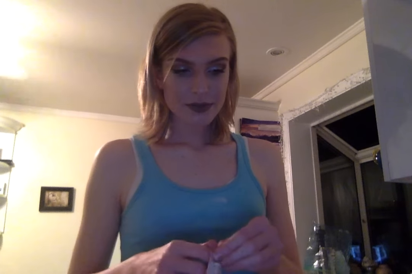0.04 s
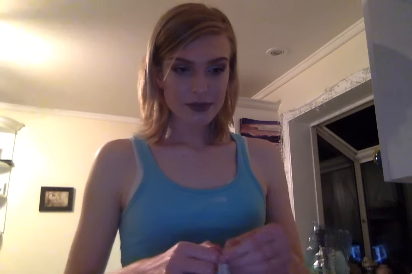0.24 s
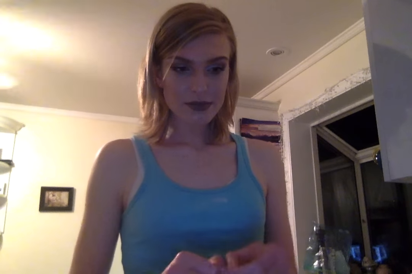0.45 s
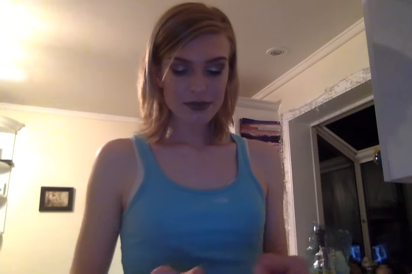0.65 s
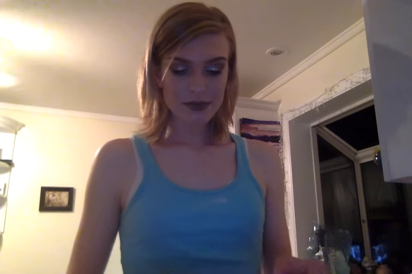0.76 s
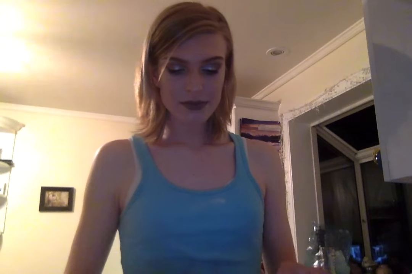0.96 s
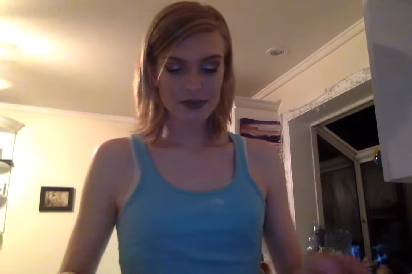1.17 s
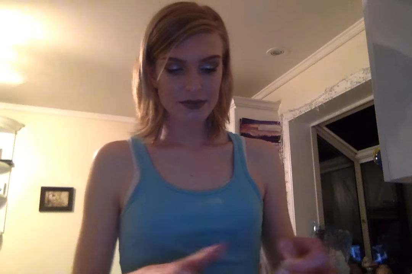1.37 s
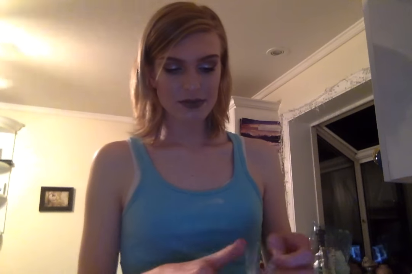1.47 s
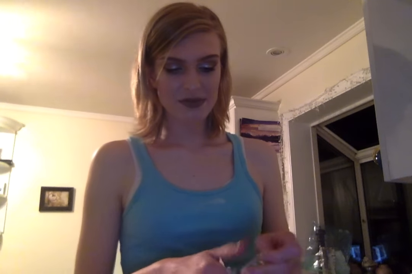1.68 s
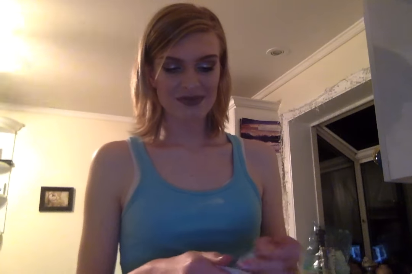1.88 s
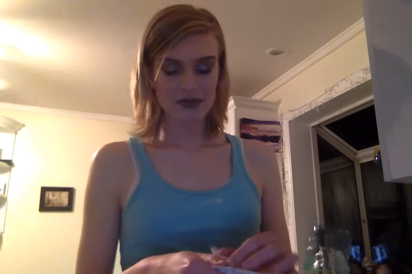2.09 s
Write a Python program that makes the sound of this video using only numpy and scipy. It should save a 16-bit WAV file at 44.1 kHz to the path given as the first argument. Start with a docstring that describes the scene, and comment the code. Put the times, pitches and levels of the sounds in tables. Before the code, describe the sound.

A small wrapper of paper and plastic film is peeled open by hand, close to the microphone. In the first half second the film gives a few light, crisp snaps. At about 0.6 seconds the seal tears in one pull lasting until about 0.9 seconds. This is the loudest part, with a crackly rip, a slight drumming of taut paper, sharp snaps and soft bumps of the fingers against the packet. After a brief lull, a very short rip comes at 1.1 seconds, followed by uneven crinkling and clicking as the film bends. A second, weaker rip comes at 1.7 seconds, and lighter crinkles and snaps continue to the end, just after 2 seconds. The kitchen adds a slight, short reverberation, and a faint, steady fan noise with electrical hum lies underneath throughout.

```python
"""A paper-and-film syringe wrapper is peeled open by hand, close by, over a faint fan and mains hum.
First the film buckles in a few light snaps, each reflected by the kitchen counter and walls.
At 0.6 s the seal tears in one long pull: fibres break, the paper drums, the snaps grow loud
and the fingers bump the packet. Then the bent film crinkles and snaps on to the end,
while the seal gives in two short rips, at 1.1 s and 1.7 s."""
import sys
import numpy as np
from scipy import signal
from scipy.fft import rfft, irfft
from scipy.io import wavfile
from scipy.ndimage import uniform_filter1d

SR = 44100
rng = np.random.default_rng(int(sys.argv[2]) if len(sys.argv) > 2 else 0)


def persist_wave(psi):
    """Save psi, clipped to +-1, as 16-bit WAV."""
    counts = np.round(np.clip(psi, -1, 1) * 32767).astype(np.int16)
    wavfile.write(sys.argv[1], SR, np.atleast_2d(counts).T)


N = 94550
TIME = np.arange(N) / SR

# spectrum of the fan's air noise: (frequency [Hz], relative level [dB])
FAN_SPECTRUM = [(30, -35), (85, -10), (170, -4), (240, 1), (400, -4), (680, -11.5), (870, 1), (1300, -8.5),
                (1800, -20), (3200, -24), (5500, -22), (9000, -31), (12000, -42), (15000, -73.5)]
# mains hum and fan tones: (frequency [Hz], rms level [dB])
HUM_TONES = [(60, -95.5), (99, -111), (120, -89.5), (167, -83), (590, -90.5), (1170, -74)]
# reflections from the counter, hands and body: (delay [s], gain [ratio])
EARLY_ECHOES = [(.0011, 0.17), (.0029, 0.2), (.0042, 0.12), (.0074, 0.067)]
# reverberation of the kitchen: (frequency [Hz], time to fall 60 dB [s])
REVERB_TIMES = [(200, 0.18), (1000, 0.28), (2500, 0.21), (5000, 0.17), (8000, 0.17), (15000, 0.15)]
# fingers bumping the packet: (time [s], energy [dB], centre frequency [Hz])
FINGER_BUMPS = [(.645, -26, 497), (0.674, -44, 308), (0.73, -30, 297), (0.75, -36, 304),
                (0.839, -38.5, 380), (0.86, -45, 387), (1.115, -40, 273)]
# fingers bending the wrapper: (start [s], rise [s], hold [s], relative level [dB])
FILM_BENDS = [(0, 0.001, 0.023, -49.5), (0.877, 0.019, 0.012, -48.5), (1.002, .004, 0.0031, -53.5),
              (1.126, 0.011, 0.16, -48), (1.243, 0.0076, 0.014, -42), (1.371, 0.0054, 0.0025, -44.5),
              (1.413, 0.0052, 0.0022, -56.5), (1.575, 0.019, .17, -48), (1.594, 0.0093, 0.014, -38.5),
              (1.908, 0.04, .018, -48), (1.969, 0.02, 0.027, -42.5), (2.048, 0.017, 0.0034, -45.5),
              (2.115, 0.023, .01, -41)]
# spectrum of the creasing film: (frequency [Hz], relative level [dB])
FILM_SPECTRUM = [(200, -16), (700, -20), (1300, -8.5), (1900, -9.5), (2600, 4), (3200, -4), (4700, 3),
                 (7000, 0.5), (10000, -6), (15000, -8)]
# spectrum of the breaking seal: (frequency [Hz], relative level [dB])
SEAL_SPECTRUM = [(50, -51), (200, -34), (600, -47), (900, -21.5), (1500, -4.5), (2000, -10.5), (2550, 2),
                 (3200, -4.5), (4700, 0), (7000, -3.5), (10000, -9), (15000, -14)]
# spectrum of the taut paper: (frequency [Hz], relative level [dB])
SHEET_SPECTRUM = [(40, -58.5), (120, -35.5), (260, -29), (400, -15.5), (560, -12.5), (780, -5.5),
                  (1050, -2.5), (1400, 0), (2000, -6), (4000, -8), (15000, -18.5)]
# tugs on the paper within the long pull: (time [s], level [dB])
SHEET_TUGS = [(0.625, -32.5), (0.66, -38), (0.719, -40.5), (0.788, -46.5)]
# short rips: (start [s], rise and hold [s], decay constant [s], seal level [dB], knock level [dB],
# knock's low edge [Hz], knock's high edge [Hz])
SHORT_RIPS = [(1.1118, 0.0079, 0.0027, -24, -40.5, 790, 1170),
              (1.7104, 0.0038, 0.0031, -34.5, -39.5, 580, 1380)]
# buckles of the film: (time [s], energy before bass loss [dB], centre frequency [Hz],
# bandwidth [octaves], flutter decay constant [s])
FILM_BUCKLES = [(0.005, -18.5, 4630, 0.86, 0.0031), (0.0257, -22.5, 4380, 0.39, 0.0083),
                (0.099, -35.5, 3800, 1.27, 0.0053), (0.2042, -13.5, 9540, 0.45, 0.00029),
                (0.2039, -31, 1870, 0.52, 0.0011), (0.204, -22.5, 5060, 0.83, 0.003),
                (0.2708, -24.5, 6780, 0.86, 0.0002), (0.2724, -14, 4520, 0.52, 0.00058),
                (0.5058, -37.5, 3790, 0.4, 0.00057), (0.5545, -28.5, 5800, 0.23, 0.0014),
                (0.569, -18.5, 5640, 1.46, 0.0018), (0.5866, -16.5, 6000, 2, 0.0006),
                (0.6041, -11, 6540, 1.4, 0.00093), (0.629, -2.5, 5150, 1.14, 0.00019),
                (0.6739, -2, 7300, 2.4, 0.00022), (0.6853, -7.5, 7600, 1.6, 0.00019),
                (0.6883, -3, 3660, 1.64, 0.001), (0.707, -13, 5900, 1.9, 0.00045),
                (0.7412, 1, 5100, 1.43, 0.00055), (0.7657, -8, 5100, 1.7, 0.00021),
                (0.781, -9, 5940, 1.5, 0.0025), (0.7975, -3.5, 3550, 1.7, 0.001),
                (0.8107, -14, 5530, 2.7, 0.0004), (0.8382, -7.5, 4400, 1.87, 0.0051),
                (0.8464, -9.5, 4940, 0.18, 0.0018), (0.9405, -27.5, 2980, 0.76, 0.00043),
                (1.0123, -25.5, 7400, 1.8, 0.000746), (1.0989, -17.5, 5500, 0.76, 0.00024),
                (1.15, -14, 8300, 1.3, 0.00019), (1.1819, -11.5, 4740, 2.04, 0.00026),
                (1.186, -7, 3860, 1, 0.00039), (1.2043, -21, 5240, 2.2, 0.00041),
                (1.23, -18, 4140, 2.6, 0.00028), (1.244, -7, 4870, 1.27, 0.00014),
                (1.2482, -10.5, 5960, 5, 0.00023), (1.274, -17.5, 4370, 2.7, 0.00026),
                (1.3285, -27, 3800, 0.63, 0.003), (1.3525, -17.5, 5650, 1.5, 0.0021),
                (1.3774, -18, 4820, 1.9, 0.0015), (1.3842, -15, 7220, 0.23, 0.00023),
                (1.422, -29, 5600, 0.94, 0.002), (1.5445, -10.5, 3430, 1.98, 0.0017),
                (1.5486, -13, 4000, 1.96, 0.00059), (1.5559, -18.5, 5640, 1.2, 0.0004),
                (1.5842, -13.5, 4200, 2, 0.002), (1.633, -13.5, 3330, 1.65, 0.0032),
                (1.6999, -12, 8800, 1.7, 0.00024), (1.705, -12.5, 3350, 2.3, 0.00013),
                (1.724, -30, 5140, 0.43, 0.001), (1.8399, -28.5, 4000, 1.13, 0.002),
                (1.8574, -28.5, 2760, 1.35, 0.001), (1.887, -32.5, 2790, 0.25, 0.001),
                (1.9349, -26, 6480, 1.1, 0.0015), (2.0124, -16.5, 5180, 2.5, 0.0047),
                (2.0675, -19.5, 3960, 1.35, 0.0023), (2.117, -13.5, 6300, 1.24, 0.00068)]


def from_db(db):
    """Amplitude ratio: tenfold for every 20 dB."""
    return 10 ** (np.asarray(db) / 20)


def rms_one(x):
    """Normalisation to unit mean power."""
    return x / np.sqrt(np.mean(x ** 2) + 1e-20)


def energy_one(x):
    """Normalisation to unit total energy."""
    return x / np.sqrt(np.sum(x ** 2) + 1e-20)


def at_hz(points, hz):
    """Interpolation of a table on a logarithmic frequency axis."""
    frequencies, values = np.transpose(points)
    return np.interp(np.log(np.maximum(hz, 1)), np.log(frequencies), values)


def band(x, low_hz, high_hz, order=2):
    """Causal band-pass filtering, with edges held below half the sample rate."""
    top_hz = min(high_hz, .47 * SR)
    edges = [min(low_hz, top_hz - 100), top_hz]
    return signal.sosfilt(signal.butter(order, edges, "band", fs=SR, output="sos"), x)


def resonance(force, hz, octaves):
    """Resonance: a body responds in a band around its natural frequency. Unit energy."""
    half_width = 2 ** (octaves / 2)
    return energy_one(band(force, hz / half_width, hz * half_width))


def colour(x, spectrum, size=2048):
    """Minimum-phase filtering to a given spectrum: nothing sounds before its cause."""
    gains = from_db(at_hz(spectrum, np.fft.rfftfreq(size, 1 / SR)))
    cepstrum = irfft(np.log(gains))
    cepstrum[1:size // 2] *= 2
    cepstrum[size // 2 + 1:] = 0
    response = irfft(np.exp(rfft(cepstrum)))
    return signal.fftconvolve(x, response)[:len(x)]


def gesture(start_s, attack_s, hold_s, release_db_per_s, sag_db_per_s=0):
    """Envelope of one hand movement: linear rise, a hold that may sag, exponential relaxation."""
    age = TIME - start_s
    held = np.maximum(age - attack_s, 0)
    fall_db = sag_db_per_s * np.minimum(held, hold_s) + release_db_per_s * np.maximum(held - hold_s, 0)
    return np.clip(age / attack_s, 0, 1) * from_db(-fall_db)


def stick_slip(depth_db, rate_hz):
    """Stick-slip friction: random catching and slipping modulates the amplitude. Unit rms."""
    steps = np.clip(rng.standard_normal(N), -1.7, 1.7)
    grip = uniform_filter1d(steps[(TIME * rate_hz).astype(int)], size=40)
    return rms_one(from_db(depth_db * grip))


def grains(per_s, spread_db, even_s=0.0062):
    """Shot noise: tiny fractures of uneven size, fed steady power by a steady hand. Unit rms."""
    sizes = from_db(spread_db * np.minimum(rng.exponential(1, N), 4)) * rng.choice([-1, 1], N)
    clicks = sizes * (rng.random(N) < per_s / SR)
    power = uniform_filter1d(clicks ** 2, int(even_s * SR))
    return rms_one(clicks / np.sqrt(np.abs(power) + 0.11 * power.mean()))


def pitched_grains(per_s, spread_db, count=7):
    """Local resonance: each fracture rings its own patch of film, in a band about an octave wide."""
    edges_hz = np.geomspace(500, 19000, count + 1)
    patches = [band(grains(per_s / count, spread_db), low / 1.15, high * 1.15)
               for low, high in zip(edges_hz, edges_hz[1:])]
    return rms_one(sum(patches))


def fan(air_db=-70.5, whirr_db=-70):
    """Flow noise of a small fan, with a duct resonance and steady fan and mains tones."""
    air = from_db(air_db) * rms_one(colour(rng.standard_normal(N), FAN_SPECTRUM))
    whirr = from_db(whirr_db) * rms_one(band(rng.standard_normal(N), low_hz=1080, high_hz=1280))
    hum = sum(np.sqrt(2) * from_db(db) * np.sin(2 * np.pi * (hz * TIME + rng.random()))
              for hz, db in HUM_TONES)
    return air + whirr + hum


def kitchen(x, scatter_db=-6, scatter_s=0.0041, tail_db=-9, build_s=0.00069, path_change=.15):
    """Reflection, scattering off things on the counter, reverberation; paths shift as the hands move."""
    size, moments = 14000, 24
    age, out = np.arange(size) / SR, np.zeros(N + size)
    edges_hz = np.geomspace(100, 20000, 10)
    white = rng.standard_normal((2, moments, size))
    tails = np.zeros((moments, size))
    for k, (low, high) in enumerate(zip(edges_hz, edges_hz[1:])):
        t60_s = at_hz(REVERB_TIMES, np.sqrt(low * high))
        tails += band(white[k % 2], low, high) * from_db(-60 * age / t60_s)
    tails = band(tails, low_hz=67, high_hz=12500, order=4)
    # each moment has its own impulse response
    for moment, tail in zip(np.array_split(np.arange(N), moments), tails):
        response = 1.0 * (age == 0)
        for delay_s, gain in EARLY_ECHOES:
            response[int(delay_s * (1 + path_change * rng.uniform(-1, 1)) * SR)] += gain
        scatter = rng.standard_normal(size) * np.exp(-age / scatter_s) * (age > 0)
        response += from_db(scatter_db) * energy_one(scatter)
        response += from_db(tail_db) * energy_one(tail * (1 - np.exp(-age / build_s)))
        out[moment[0]:moment[-1] + size] += signal.fftconvolve(x[moment], response)
    return out[:N]


def bumps():
    """Impact excitation: the whole packet thuds softly between the fingers."""
    return sum(from_db(db) * resonance(signal.unit_impulse(N, int(s * SR)) + 1e-18, hz, octaves=0.5)
               for s, db, hz in FINGER_BUMPS)


def crinkle(gain_db=-1, firm_above_db=-44):
    """Crackling noise: fine creases give way while the film is bent, then relax."""
    bend = np.max([from_db(db) * gesture(s, rise, hold, release_db_per_s=465)
                   for s, rise, hold, db in FILM_BENDS], axis=0)
    bend *= stick_slip(depth_db=3.87, rate_hz=180)
    # a firm bend crackles unevenly, a light one gives an even, duller rustle
    crackle = rms_one(colour(pitched_grains(per_s=3200, spread_db=9.5), FILM_SPECTRUM))
    rustle = rms_one(colour(pitched_grains(per_s=3200, spread_db=-0.5), FILM_SPECTRUM))
    rustle = band(rustle, low_hz=333, high_hz=9000, order=4)
    firmness = bend ** 2 / (bend ** 2 + from_db(firm_above_db) ** 2)
    return from_db(gain_db) * bend * (firmness * crackle + np.sqrt(1 - firmness ** 2) * rustle)


def tearing(pull_db=-31.5):
    """Fracture and forced vibration: seal fibres break by the thousand and shake the taut paper."""
    # the seal gives at once, parts more easily as it opens, and runs out
    pull = gesture(start_s=.603, attack_s=0.0017, hold_s=0.24, release_db_per_s=425, sag_db_per_s=27)
    pull *= from_db(pull_db) * stick_slip(depth_db=-0.5, rate_hz=240)
    fibres = pull * rms_one(colour(pitched_grains(per_s=5200, spread_db=5.0), SEAL_SPECTRUM))
    # each tug draws the sheet taut, then it slackens
    tension = np.max([from_db(db) * gesture(s, attack_s=0.0086, hold_s=0.021, release_db_per_s=275)
                      for s, db in SHEET_TUGS], axis=0)
    sheet = tension * rms_one(colour(grains(per_s=2500, spread_db=3.0), SHEET_SPECTRUM))
    # in a quick rip the fibres break far more densely
    rush = rms_one(colour(grains(per_s=12000, spread_db=2.0), SEAL_SPECTRUM))
    for s, drive_s, decay_s, seal_db, knock_db, low_hz, high_hz in SHORT_RIPS:
        age = TIME - s
        stroke = np.clip(2 * age / drive_s, 0, 1) * np.exp(-np.maximum(age - drive_s, 0) / decay_s)
        fibres += from_db(seal_db) * stroke * rush
        # the sheet jerks taut and gives a hollow knock
        knock = rms_one(band(rng.standard_normal(N), low_hz, high_hz, order=4))
        local_rms = np.sqrt(np.abs(uniform_filter1d(knock ** 2, size=300)) + 0.13)
        sheet += from_db(knock_db) * stroke * knock / local_rms
    # the sheet is too small to radiate deep bass
    return band(fibres + sheet, low_hz=190, high_hz=20000)


def snaps(flutter=.28, surround_db=-18, surround_growth=0.36, size=1024):
    """Buckling: each kick makes a small facet of film ring at its own pitch and flutter briefly."""
    age, out = np.arange(size) / SR, np.zeros(N + size)
    median_db = np.median([row[1] for row in FILM_BUCKLES])
    for s, db, hz, octaves, flutter_s in FILM_BUCKLES:
        kick = (age == 0) + flutter * rng.standard_normal(size) * np.exp(-age / flutter_s)
        facet = resonance(kick, hz, octaves)
        # harder buckles shake more of the film around the facet
        surround_gain = from_db(surround_db + surround_growth * (db - median_db))
        surround = surround_gain * resonance(kick, hz, octaves=5.5)
        start = int(s * SR)
        out[start:start + size] += from_db(db) * energy_one(facet + surround)
    # so small a radiator gives off almost no bass
    return band(out[:N], low_hz=1240, high_hz=18400)


def scene():
    """Superposition: the wrapper and its room response add to the fan, in one channel."""
    wrapper = snaps() + crinkle() + tearing() + bumps()
    return (kitchen(wrapper) + fan())[None]


def record(dry, cutoff_hz=16100):
    """Band limiting: a steep low-pass removes the highest treble."""
    return signal.sosfilt(signal.ellip(10, .1, 80, cutoff_hz, fs=SR, output="sos"), dry)


dry = scene()
out = record(dry)
persist_wave(out)
```